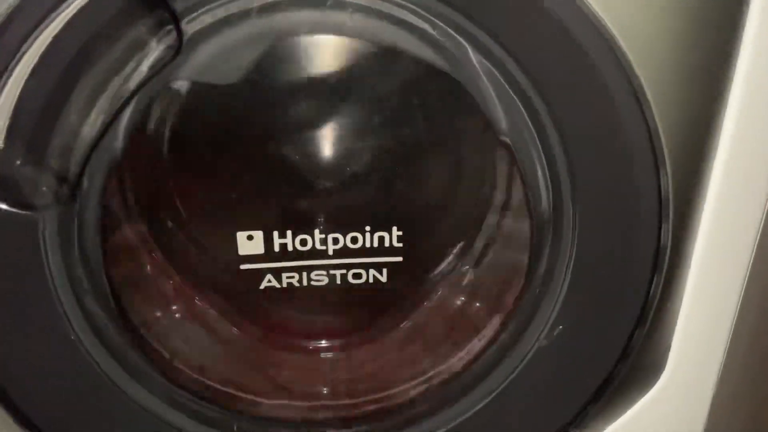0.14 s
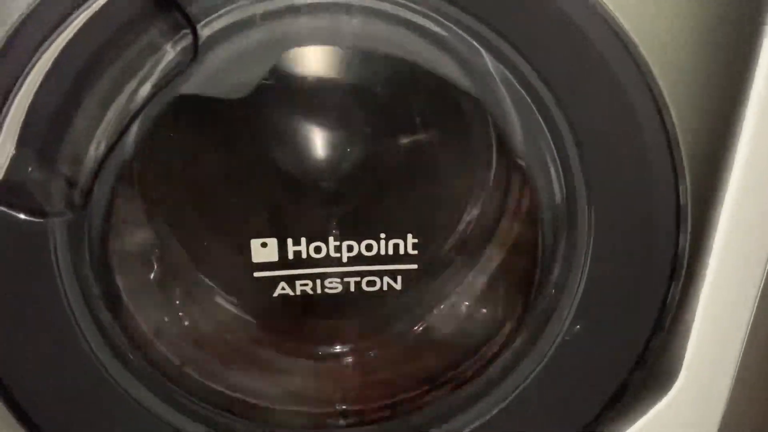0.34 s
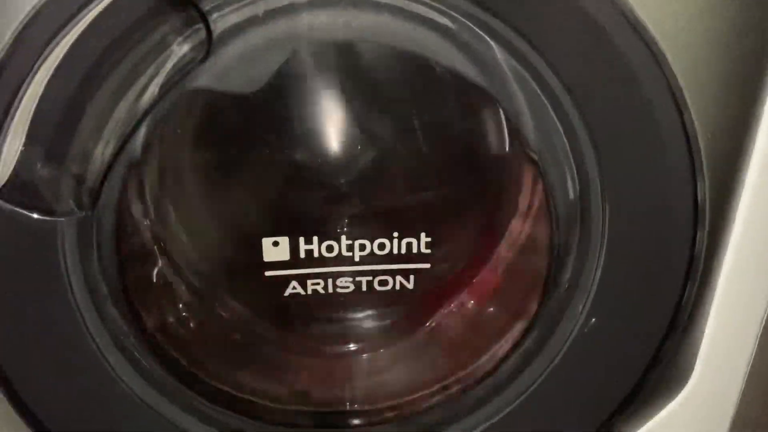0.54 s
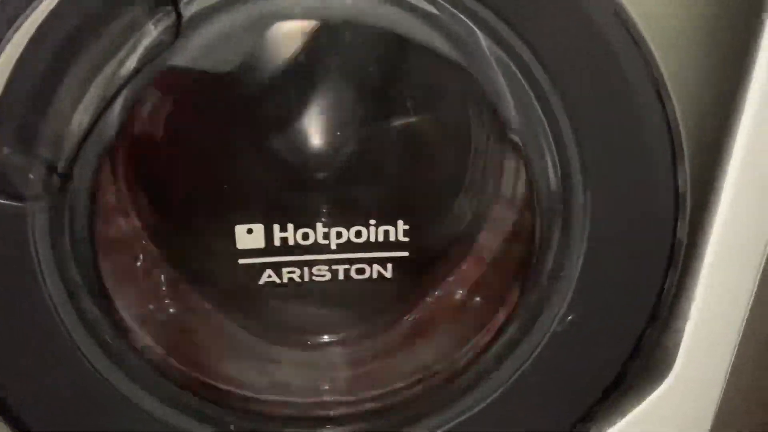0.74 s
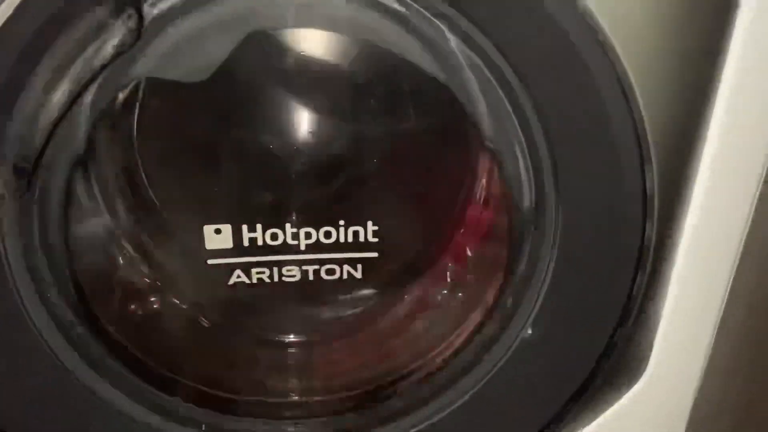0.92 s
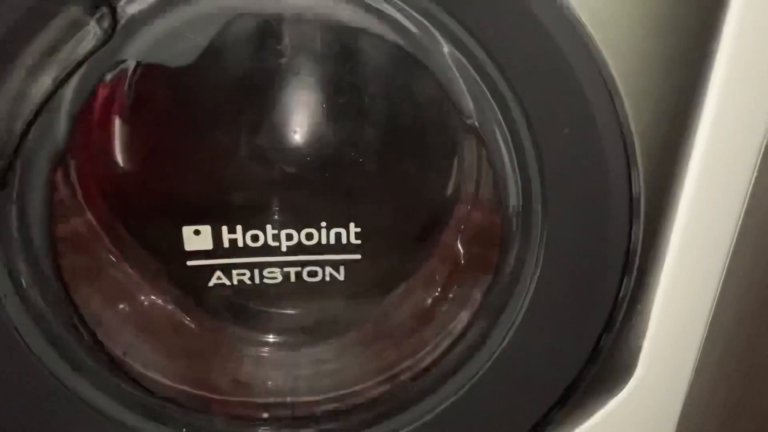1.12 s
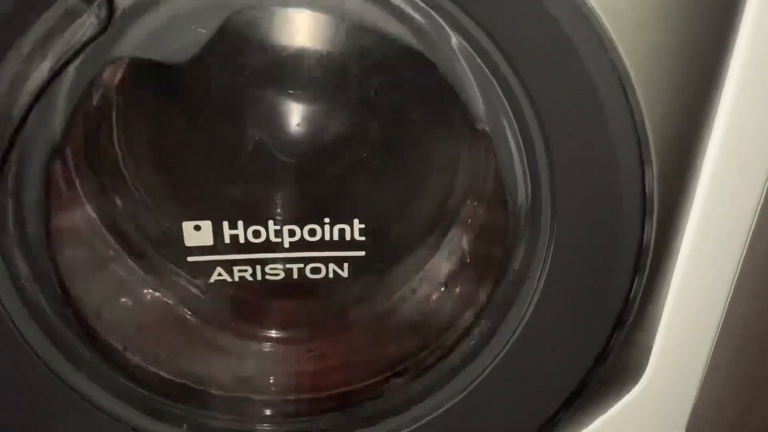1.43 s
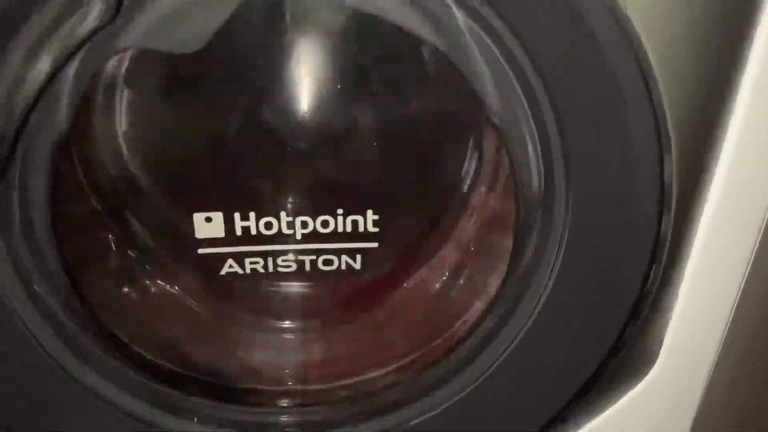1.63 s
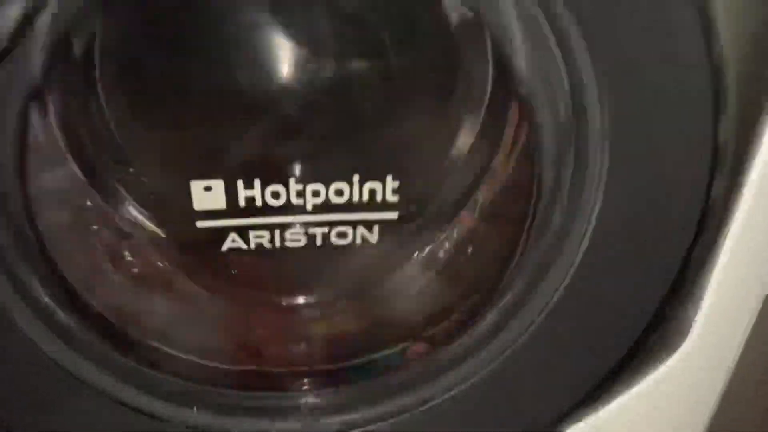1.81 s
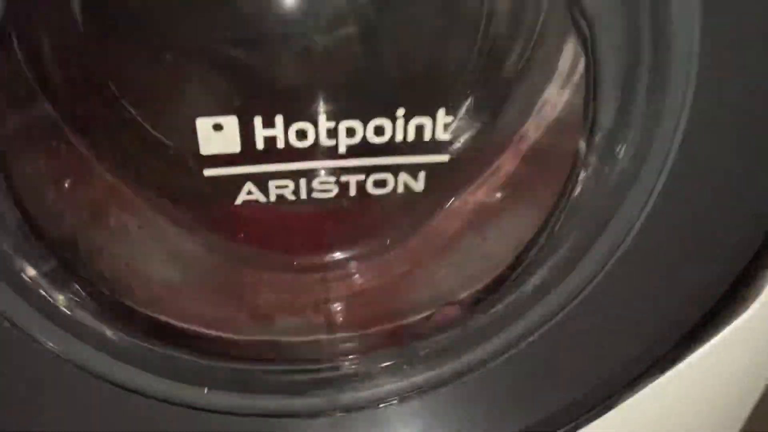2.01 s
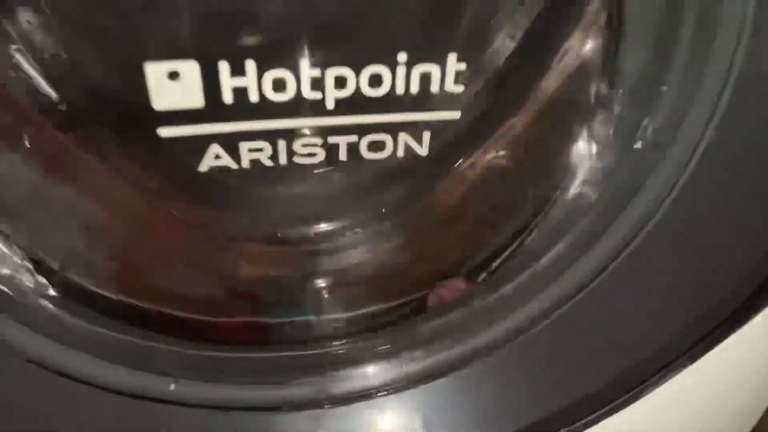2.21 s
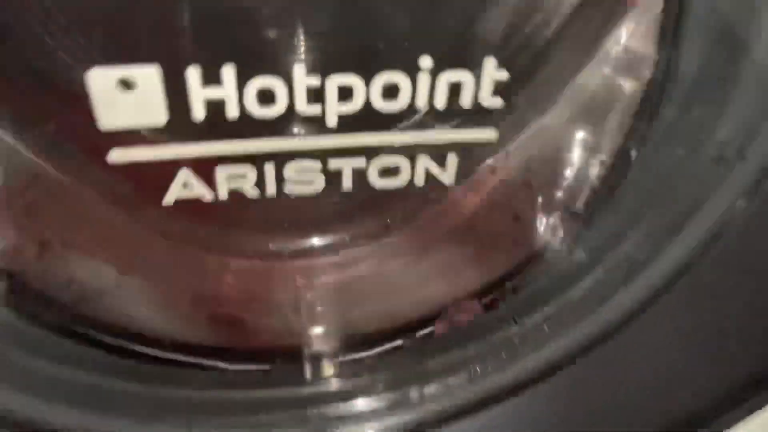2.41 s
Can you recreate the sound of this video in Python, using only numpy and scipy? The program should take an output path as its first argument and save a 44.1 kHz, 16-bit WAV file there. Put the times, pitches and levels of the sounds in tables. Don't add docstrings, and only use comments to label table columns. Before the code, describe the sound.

Close steady drone of a spinning washing machine drum, with booming swells and a short hard tap

```python
import sys
import numpy as np
from scipy import signal
from scipy.fft import rfft, irfft, next_fast_len
from scipy.io import wavfile
from scipy.ndimage import uniform_filter1d, map_coordinates

SR = 44100
rng = np.random.default_rng(int(sys.argv[2]) if len(sys.argv) > 2 else 0)


def makeup_ratio(level_db):
    decades = np.asarray(level_db, float) / 20
    return 10 ** decades


def wav_record(signal):
    frames = np.transpose(np.atleast_2d(signal))
    bounded = np.clip(frames, -1, 1)
    quanta = np.round(bounded * 32767).astype(np.int16)
    wavfile.write(sys.argv[1], SR, quanta)


N = 112455

# mains_multiple, level_db, sway_db
MOTOR_ORDERS = [(2, -60.5, 3), (3, -43, 1), (5, -56, 4.5), (6, -53.5, 3.5), (7, -61, -0.5),
                (10, -58.5, 4.5), (11, -58.5, 4), (12, -54.5, 8.5), (13, -57, -3), (14, -55.5, 4),
                (18, -64.5, 4.5)]
# time_s, fourth_order_level_db
FLOOR_PULL = [(0.0, -33.5), (0.05, -33), (0.57, -35.5), (0.82, -54), (0.99, -57), (1.08, -37), (1.14, -46),
              (1.53, -40), (1.73, -45.5), (1.75, -41.5), (2.53, -41), (2.55, -27)]
# time_s, level_db
DRUM_STRENGTH = [(0, -50), (.1, -47), (.5, -47), (.62, -48.5), (.75, -48.5), (.87, -52.5), (.97, -49),
                 (1.06, -42), (1.13, -46.5), (1.18, -47.5), (1.6, -51), (1.73, -48), (1.82, -41.5),
                 (1.92, -47), (2.1, -48), (2.35, -45.5), (2.48, -44.5), (2.55, -47)]
# pitch_hz, width_hz, level_db
CABINET_MODES = [(57.3, 17.3, 0), (75.2, 8, 3.5), (125.1, 10.4, 2.5), (183.6, 58, -5), (260.5, 31, -8),
                 (354.1, 19, -7.5), (494, 31.3, -11.5), (611, 55, -16), (703, 59, -15), (907, 14, -20.5)]
# pitch_hz, level_db (per Hz)
RUSH_COLOUR = [(410, -39), (700, -3.5), (817, -12), (1360, -12), (1730, -15), (2520, -14), (7000, -35.5),
               (9100, -64), (15400, -120), (16000, -41)]
# pitch_hz, level_db (per Hz)
FIZZ_COLOUR = [(1500, -11.5), (3000, -8.5), (5000, -4.5), (9000, -15.5), (16000, -11.5)]
# pitch_hz, width_hz, level_db
PLINTH_MODES = [(299.5, 180, -3), (355, 67, 2.5), (496, 85, -0.5), (947, 56, -4.5), (1122, 100, -12),
                (1530, 200, -10.5)]
TAP_TIMES = [.542, .766, .372, 1.452, .72, 2.185, .04, 1.03, 1.07, 1.81, 1.68, 2.47, 1.52]
# level_db, centre_hz, spread_octaves, t60_s
TAP_TONES = [(-42.5, 4000, 1.4, 0.2), (-53.5, 4600, 0.31, 0.064), (-57.5, 13000, 0.68, .06),
             (-57.5, 7000, 1.5, 0.19), (-59.5, 13000, .8, .05), (-57, 4900, 0.44, .1),
             (-55.5, 13000, .4, .06), (-51.5, 1400, 0.51, 0.14), (-59.5, 2200, 1.1, 0.1),
             (-58, 2800, 0.95, 0.18), (-55.5, 2500, 0.22, 0.12), (-54, 1100, 0.35, 0.14),
             (-56.5, 3000, 0.77, 0.1)]
# pitch_hz, width_hz, level_db
STEEL_MODES = [(1600, 810, -4), (2420, 630, -3), (2840, 340, -5), (3410, 220, 0), (3720, 180, 2),
               (4037, 174, 1), (4870, 500, -7.5), (6240, 270, -1.5), (7200, 900, -7), (12400, 3300, -10)]
# peak_s, peak_db, pitch_hz, width_s
PANEL_SWELLS = [(.08, -34, 76.8, 0.072), (.22, -31, 75, 0.077), (.36, -27.5, 72, 0.019),
                (.47, -32.5, 83, 0.045), (.71, -33, 70, 0.025), (1.29, -29, 79, 0.047),
                (1.6, -39.5, 75, 0.049), (1.95, -40, 76, 0.045), (2.19, -37, 76, .04),
                (2.43, -30.5, 78, 0.034), (2.55, -29, 69, 0.038), (.67, -37.5, 154, 0.065),
                (1.05, -36.5, 163, 0.033), (1.3, -38.5, 152, 0.039), (1.81, -34.5, 152, 0.034),
                (2.04, -31.5, 148, 0.047), (2.26, -29.5, 151, 0.05), (2.49, -36.5, 153.5, 0.021),
                (2.16, -38, 260, 0.062), (.13, -37.5, 620, 0.018), (.48, -41, 620, 0.021),
                (.43, -42.5, 710, 0.046), (.77, -45, 630, .03), (1.45, -44, 705, .08),
                (1.54, -42, 700, .04), (2.0, -46, 730, 0.037), (2.5, -40, 600, .05),
                (2.36, -51.5, 652, 0.081), (2.48, -41.5, 280, .06), (2.44, -42, 253, 0.055)]
# pitch_hz, level_db
SUM_TONE = [(40, 2), (6000, -1), (7500, -5), (8500, -5), (10000, -27), (13500, -31), (14600, -17.5),
            (15500, -9.5)]
# pitch_hz, level_db
DIFFERENCE_TONE = [(60, -45.5), (150, -38), (300, -14), (600, -8), (1300, -6.5), (1900, -13.5), (2900, -1),
                   (4300, -6), (8000, -0.5), (12000, -7), (12800, -14.5), (15700, -6.5)]
# pitch_hz, power_share (0 to 1)
DIFFERENCE_SHARE = [(300, 0.23), (1500, .15), (3000, .3), (5000, .3), (8000, .3)]

MAINS_HZ, DRIFT_RAD, SWAY_PER_S, HUM_FOLLOWS = 50.38, .11, 14, 0.43
CABINET_DB, CABINET_FOLLOWS = -38.5, 0.8
RUSH_DB, FIZZ_DB, FIZZ_FOLLOWS = 2, -9, 0.14
PLINTH_DB, PLINTH_FOLLOWS = -6, 1.24
RATTLE_S, CRACK_DB, CRACK_T60_S, ECHO_T60_S, ECHO_DB = 0.014, -0.5, 0.021, 0.5, -9.5
TOP_HZ = 15760


def unit(x):
    return x / np.sqrt(np.mean(x ** 2) + 1e-20)


def along(points, hz):
    f, v = np.transpose(points)
    return np.interp(np.log(hz + 1), np.log(f + 1), v)


def curve(rows):
    return np.interp(np.arange(N) / SR, *np.transpose(rows))


def wobble(rate):
    return map_coordinates(rng.standard_normal(200), [np.arange(N) * rate / SR], mode="wrap")


def filtered(x, response):
    m = next_fast_len(N + SR // 2)
    return irfft(rfft(x, m) * response(np.fft.rfftfreq(m, 1 / SR)), m)[..., :N]


def resonances(table):
    def response(f):
        total = 0
        for k, (centre, width, db) in enumerate(table):
            damping = 1j * f * width
            total = total + (-1) ** k * makeup_ratio(db) * damping / (centre * centre - f * f + damping)
        return total
    return response


def patchy(patchy_db, streak_db):
    z = signal.stft(rng.standard_normal((2, N)), nperseg=2048, noverlap=1536)[2]

    def field(bins, frames):
        grains = rng.standard_normal(z.shape[1:])
        smooth = uniform_filter1d(grains, size=bins, axis=0)
        return unit(uniform_filter1d(smooth, size=frames, axis=1))

    broad = field(bins=20, frames=6)
    narrow = field(bins=2, frames=8)
    gain = makeup_ratio(patchy_db * broad + streak_db * narrow)
    return signal.istft(z * gain, nperseg=2048, noverlap=1536)[1][:, :N]


def motor():
    turn = 2 * np.pi * MAINS_HZ * np.arange(N) / SR
    strength_db = curve(DRUM_STRENGTH)
    load_db = HUM_FOLLOWS * (strength_db - strength_db.mean())

    def order(k, db):
        waves = []
        for _ in range(2):
            start = rng.uniform(0, 2 * np.pi)
            waves.append(np.sin(k * turn + start + k * DRIFT_RAD * wobble(SWAY_PER_S)))
        return np.sqrt(2) * makeup_ratio(db) * np.array(waves)

    hum = order(4, curve(FLOOR_PULL) - 1)
    for k, db, sway_db in MOTOR_ORDERS:
        hum = hum + order(k, db + load_db + sway_db * wobble(SWAY_PER_S))
    return hum


def drum():
    strength_db = curve(DRUM_STRENGTH)
    mean_db = strength_db.mean()
    swing_db = strength_db - mean_db

    body = unit(filtered(patchy(patchy_db=2, streak_db=2), resonances(CABINET_MODES)))
    body_db = CABINET_DB + CABINET_FOLLOWS * swing_db

    rush_colour = [(350, -39)] + RUSH_COLOUR
    rush = patchy(patchy_db=1.59, streak_db=3.5)
    rush = unit(filtered(rush, lambda hz: makeup_ratio(along(rush_colour, hz))))
    rush_db = RUSH_DB + strength_db + 0.27 * wobble(25.1)

    drops = patchy(patchy_db=0.0, streak_db=5) * makeup_ratio(0.86 * wobble(70))
    fizz = unit(filtered(drops, lambda hz: makeup_ratio(along(FIZZ_COLOUR, hz))))
    fizz_db = FIZZ_DB + mean_db + FIZZ_FOLLOWS * swing_db
    return makeup_ratio(body_db) * body + makeup_ratio(rush_db) * rush + makeup_ratio(fizz_db) * fizz


def plinth():
    pull_db = uniform_filter1d(curve(FLOOR_PULL), size=SR // 10)
    peak_db = pull_db.max()
    buzz = unit(filtered(patchy(patchy_db=-1.0, streak_db=3.5), resonances(PLINTH_MODES)))
    return makeup_ratio(PLINTH_DB + peak_db + PLINTH_FOLLOWS * (pull_db - peak_db)) * buzz


def taps():
    out = np.zeros((2, N))
    ring = resonances(STEEL_MODES)
    for start_s, (db, centre_hz, spread, t60) in zip(TAP_TIMES, TAP_TONES):
        t = np.arange(N) / SR - start_s
        after = np.maximum(t - RATTLE_S, 0)
        rattle = makeup_ratio(-60 * after / t60)
        crack = makeup_ratio(CRACK_DB - 60 * abs(t) / CRACK_T60_S)
        echo = makeup_ratio(ECHO_DB - 60 * after / ECHO_T60_S)
        shape = (t > 0) * (rattle + echo) + (t > 0) * crack

        def steel(hz):
            octaves = np.log2(hz / centre_hz + 1e-6)
            return ring(hz) * np.exp(-.5 * (octaves / spread) ** 2)

        out = out + makeup_ratio(db) * shape * unit(filtered(rng.standard_normal((2, N)), steel))
    return out


def panels():
    peak_s, db, hz, width_s = np.array(PANEL_SWELLS).T[..., None]
    t = np.arange(N) / SR - peak_s
    swell = makeup_ratio(db) * np.exp(-.5 * (t / width_s) ** 2)
    start = rng.uniform(0, 2 * np.pi, (len(PANEL_SWELLS), 2))
    booms = [np.sum(swell * np.sin(2 * np.pi * hz * t + start[:, c:c + 1]), 0) for c in range(2)]
    return np.array(booms)


def scene():
    return motor() + drum() + plinth() + taps() + panels()


def low_pass(x):
    return signal.sosfilt(signal.butter(12, 15760, fs=SR, output="sos"), x)


def record(dry):
    def dull(hz):
        low_cut = hz ** 2 / (hz ** 2 + 35 ** 2)
        return makeup_ratio(along(SUM_TONE, hz)) * (hz < TOP_HZ) * low_cut

    def thin(hz):
        share = np.clip(along(DIFFERENCE_SHARE, hz), 0, 1)
        tone = makeup_ratio(along(DIFFERENCE_TONE, hz)) * (hz < TOP_HZ)
        return tone * np.sqrt([share, 1 - share]) * [[1j], [1]]

    mid = filtered(dry[0], dull)
    side = filtered(dry, thin).sum(0)
    return low_pass(np.array([mid + side, mid - side]))


dry = scene()
out = record(dry)
wav_record(out)
```